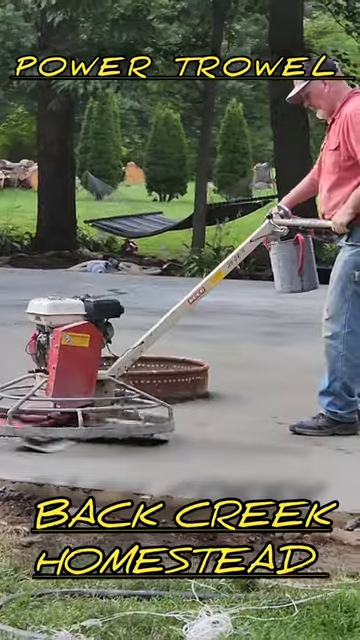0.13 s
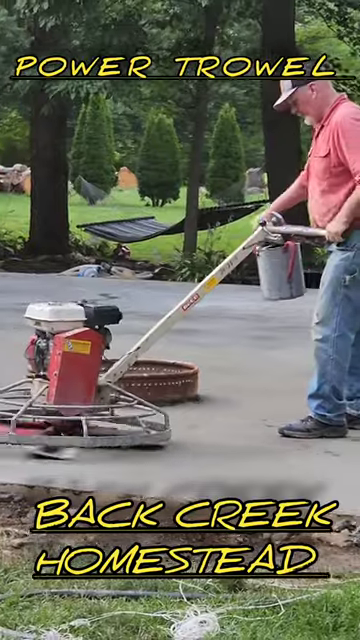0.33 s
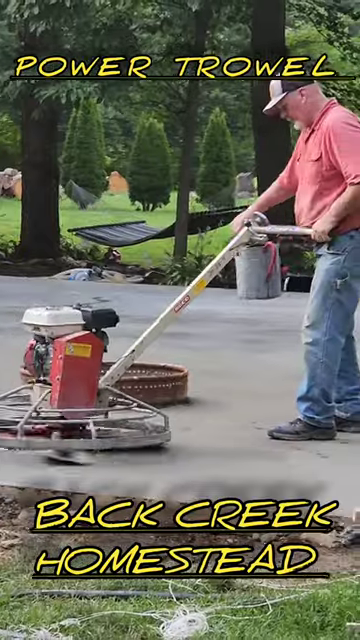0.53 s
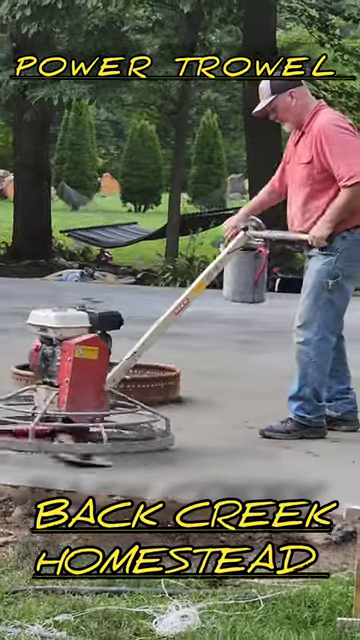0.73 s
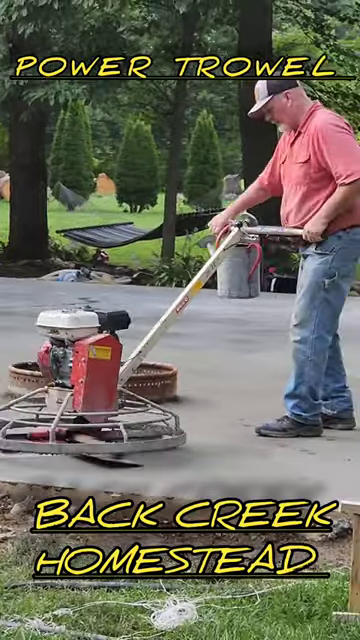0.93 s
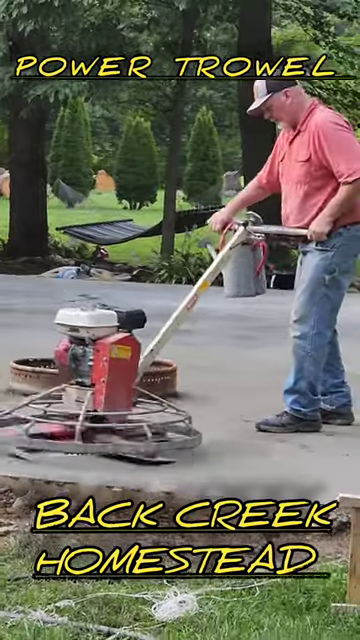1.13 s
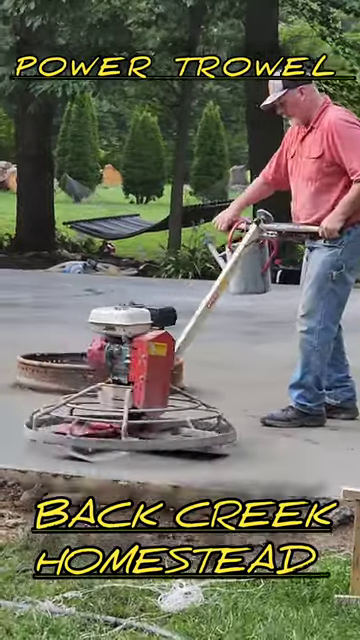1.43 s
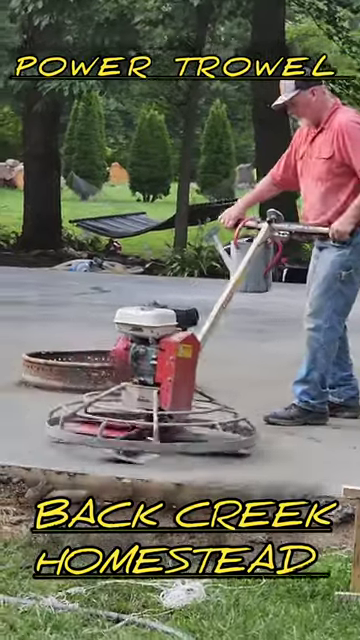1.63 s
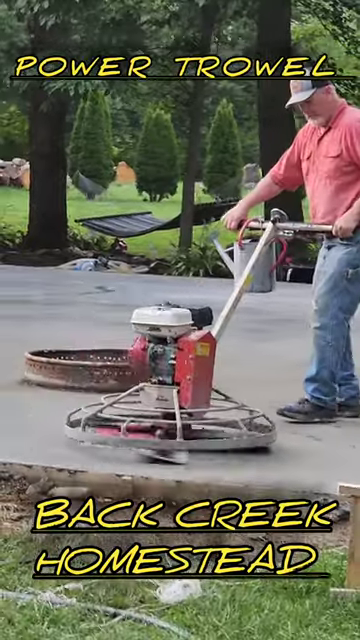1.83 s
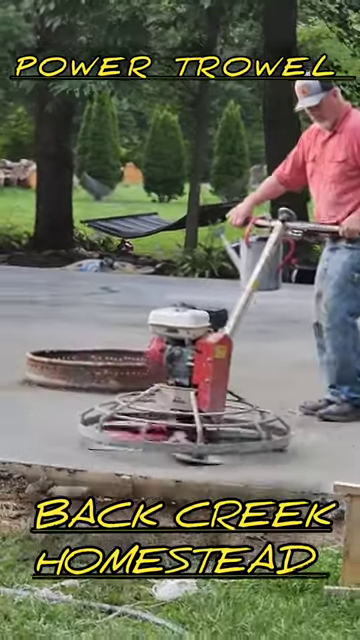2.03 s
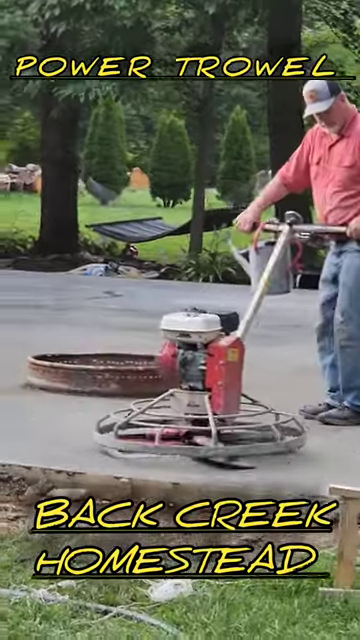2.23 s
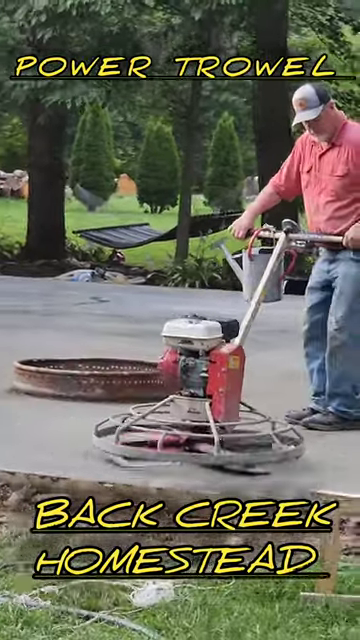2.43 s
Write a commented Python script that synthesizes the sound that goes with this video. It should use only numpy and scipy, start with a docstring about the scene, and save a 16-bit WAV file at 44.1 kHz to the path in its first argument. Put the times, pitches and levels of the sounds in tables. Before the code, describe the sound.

Concrete-smoothing machine close by: steady low engine buzz, harsh surging blade scrape, light metal rattles and clanks

```python
"""A walk-behind power trowel smooths fresh concrete outdoors, a few metres from a phone with two microphone ports.
Its single-cylinder four-stroke fires about 31 times a second: a sum of sine orders, delayed by the muffler,
whose colour shifts as the machine swings round. Steel blades scrape the slab in gritty surges of shaped noise,
with sharp ticks of grit. The guard cage rattles and clanks in dying modes, over a low rumble and a faint hum."""
import sys
import numpy as np
from scipy import signal
from scipy.fft import rfft, irfft
from scipy.io import wavfile
from scipy.ndimage import uniform_filter1d

SR = 44100
rng = np.random.default_rng(int(sys.argv[2]) if len(sys.argv) > 2 else 0)


def to_wav(s):
    """Save 16-bit WAV."""
    ch = np.atleast_2d(s).T  # columns
    pcm = np.round(np.clip(ch, -1, 1) * 32767)  # PCM
    wavfile.write(sys.argv[1], SR, pcm.astype(np.int16))


def nominal_scale(level):
    """Amplitude ratio for a level in decibels (scalar or array-like)."""
    x = np.asarray(level, float) / 20
    return 10 ** x


N = 114219
T = np.arange(N) / SR

# running speed of the engine: time_s, firing_rate_hz
SPEED = [(0.0, 31.2), (0.25, 31.4), (0.5, 31.71), (0.8, 31.58), (1.1, 31.56), (1.4, 31.36), (1.7, 31.19),
         (2.0, 31.07), (2.3, 31.05), (2.6, 30.99)]


def evened(x):
    """Scales a signal to an rms of 1."""
    return x / np.sqrt(np.mean(x ** 2) + 1e-20)


def read(points, hz):
    """Reads a curve of (hz, value) points along a logarithmic frequency axis."""
    f, value = np.transpose(points)
    return np.interp(np.log(hz + 1), np.log(f + 1), value)


def slow(top_hz, count):
    """Smooth random curves of rms 1, each a sum of slow sines that weaken with frequency."""
    f = np.geomspace(.4, top_hz, num=16)[:, None]
    t = T[::64]
    curves = []
    for _ in range(count):
        waves = np.sin(2 * np.pi * (f * t + rng.random(f.shape))) / np.sqrt(f)
        curves.append(np.interp(T, t, evened(waves.sum(0))))
    return np.array(curves)


def hiss(field_db):
    """Two unrelated noises that share a dB field over frequency and time."""
    z = rng.standard_normal((field_db.shape[1], 257, 4)).T
    spectra = (z[:2] + 1j * z[2:]) * nominal_scale(field_db)
    return signal.istft(spectra, nperseg=512, noverlap=384)[1][:, :N]


def ring(hz, t60):
    """One dying mode with a soft start of 1.6 ms."""
    t = T[:SR // 8]
    return nominal_scale(-60 * t / t60) * np.minimum(t / 0.0016, 1) * np.sin(2 * np.pi * hz * t)


def cycles():
    """Firings counted since the start: the running sum of the firing rate."""
    first_firing = .938  # cycles
    return first_firing + np.cumsum(np.interp(T, *np.transpose(SPEED))) / SR


def exhaust(turns):
    """Each order is a sine, delayed near the muffler's chambers; firings differ a little in strength and timing."""
    # exhaust orders: multiple_of_firing_rate, first_heading_db, middle_heading_db, last_heading_db
    orders = [(1, -32, -34, -37), (2, -22, -26.5, -25), (3, -27.5, -32.5, -30.5), (4, -28, -29.5, -44),
              (5, -18, -17, -14), (6, -15.5, -20, -22), (7, -28.5, -26, -29.5), (8, -20, -23.5, -21),
              (9, -22, -26.5, -21), (10, -28.5, -25.5, -32), (11, -24.5, -28.5, -28), (12, -50, -25, -37.5),
              (14, -32, -44, -54), (15, -41, -42.5, -31)]
    # muffler chambers: resonance_hz, half_width_hz, passes
    chambers = [(160.4, 14., 2), (260., 5.6, 1)]
    # swing of the machine, held within 0-2 from first to last heading: time_s, heading_step
    swing = [(.3, 0.078), (.8, 0.53), (1.2, 0.85), (1.5, 0.97), (1.8, 1.69), (2.5, 2.1)]
    pulse_turn, low_order_shift = 1.49, .8  # radians
    drift_cycles = .016  # firing cycles gained per heading step
    drift_above_hz = 200  # orders above this drift in phase with the heading
    wander_db, uneven_db, jitter_cycles = 1., 1., .002  # rms
    order, *heading_db = np.transpose(orders)
    hz = order * np.mean(SPEED, axis=0)[1]
    lag = pulse_turn - sum(passes * np.arctan((hz - f) / half) for f, half, passes in chambers)
    # order 2 is shifted ahead and order 1 behind by this phase
    lag = lag + low_order_shift * np.select([order == 2, order == 1], [1, -1])
    heading = np.clip(np.interp(T, *np.transpose(swing)), 0, 2)

    firing = rng.standard_normal((int(turns[-1]) + 3, 2))
    strength, shift = (np.interp(turns, np.arange(len(firing)), firing[:, k]) for k in range(2))
    arrival = turns + jitter_cycles * shift
    wander = slow(9.0, count=len(order))
    out = np.zeros(N)
    for k, n in enumerate(order):
        level_db = np.interp(heading, range(3), np.array(heading_db)[:, k]) + wander_db * wander[k]
        drift = drift_cycles * (heading - .5) * (hz[k] > drift_above_hz)
        out += nominal_scale(level_db) * np.cos(2 * np.pi * n * (arrival + drift) + lag[k])
    return np.sqrt(2) * out * nominal_scale(uneven_db * strength)


def scrape(frame_s, bin_hz):
    """Steel on concrete: hiss coloured by frequency, with random patches, surges and a ringing rasp."""
    # surges of the scrape: time_s, level_db, treble_db (the treble counts relative to its mean)
    surges = [(0.09, -16, -14.5), (0.2, -18, -14), (0.28, -19.5, -3.5), (0.36, -20, -11), (0.41, -18, -10),
              (0.48, -18, -14), (0.56, -18.5, -15.5), (0.71, -19, -9.5), (0.77, -17.5, -13.5),
              (0.84, -18, -12.5), (0.95, -16.5, -12.5), (1.02, -18.5, -13.5), (1.12, -16, -10),
              (1.24, -19, -12.5), (1.45, -16, -12.5), (1.56, -16.5, -10.5), (1.66, -17.5, -13),
              (1.76, -18.5, -12), (1.83, -15.5, -10.5), (1.89, -16, -13.5), (2.04, -17, -9.5),
              (2.17, -18.5, -12), (2.35, -16.5, -11.5), (2.55, -17, -11)]
    # colour of the scrape: frequency_hz, density_db (per Hz, relative)
    colour = [(250, -7), (420, -2.5), (613, 0), (725, 0), (1030, -8.5), (1230, -1), (1410, -5),
              (1670, -0.5), (1940, -8.5), (2190, -1.5), (2790, -9.5), (3060, -8.5), (3900, -4.5),
              (4330, 2.5), (5040, -12.5), (6620, -21.5), (7000, -21.5), (7330, -13.5), (7750, -20),
              (8440, -22.5), (10000, -19), (10900, -21), (12700, -16.5), (13700, -21.5), (15600, -15.5)]
    # lift of the ringing rasp of the blades: time_s, lift_db
    rasp = [(.11, -6.5), (.28, 3.5), (.45, -3.5), (.6, -1.5), (.7, 0), (1.1, -2.5), (1.3, -1), (1.58, 0),
            (1.65, -5.5), (1.9, -2), (2.15, -1.5), (2.36, 2), (2.55, -0.5)]
    rasp_hz, rasp_width_hz = 4310, 400
    patch_db, flicker_db = 1.34, 0.77  # rms
    s, level_db, treble_db = np.transpose(surges)
    patches = rng.standard_normal((len(frame_s), 257)).T
    patches = uniform_filter1d(patches, size=4, axis=0)
    patches = evened(uniform_filter1d(patches, size=20, axis=1))
    flicker = evened(uniform_filter1d(rng.standard_normal(len(frame_s)), size=4))
    field = read(colour, bin_hz)[:, None] + patch_db * patches + flicker_db * flicker

    treble = np.clip((bin_hz - 5200) / 900, 0, 1)[:, None]
    shaped = np.interp(frame_s, s, level_db)
    shaped = shaped + treble * np.interp(frame_s, s, treble_db - treble_db.mean())
    rasp_band = np.exp(-((bin_hz[:, None] - rasp_hz) / rasp_width_hz) ** 2)
    shaped = shaped + rasp_band * np.interp(frame_s, *np.transpose(rasp))

    # levels count against the unsurged power of the middle band
    mids = (bin_hz > 1000) & (bin_hz < 5500)
    power = (nominal_scale(field + shaped) ** 2).mean(1).sum()
    mid_power = (nominal_scale(field[mids]) ** 2).mean(1).sum()
    return evened(hiss(field + shaped)) * np.sqrt(power / mid_power)


def grit():
    """Random grains under the blades, each a burst of power that dies away, as a roughness of rms 1."""
    grains_per_s, spread_db, t60, share = 760, 2, 0.0094, 0.35  # t60 in seconds, share 0-1
    grains = nominal_scale(spread_db * np.minimum(rng.exponential(1, N), 6)) * (rng.random(N) < grains_per_s / SR)
    power = signal.lfilter([1], [1, -nominal_scale(-120 / (t60 * SR))], grains ** 2)
    return evened(1 - share + share * evened(np.sqrt(power)))


def blades(turns):
    """The scrape, roughened by grit and puffing slightly with each firing."""
    frame_s = np.arange(N // 128 + 5) * 128 / SR
    noise = scrape(frame_s, np.fft.rfftfreq(512, 1 / SR))
    puff_db, puff_phase = 1.1, -.03  # peak gain, cycles
    puff = nominal_scale(puff_db * np.cos(np.pi * (turns + puff_phase)) ** 4)
    return noise * grit() * puff


def ticks():
    """Sharp ticks of grit under a blade: dying bursts of noise through a high-pass."""
    # ticks: start_s, level_db (before the high-pass)
    bursts = [(0.166, -16.5), (.6894, -17), (.8032, -31), (1.2654, -15), (1.378, -16), (2.0483, -16),
              (2.452, -18)]
    t60, low_hz = 0.028, 5000  # s, Hz
    out, t = np.zeros((2, N)), T[:SR // 30]
    for (s, db), burst in zip(bursts, rng.standard_normal((len(bursts), 2, len(t)))):
        out[:, round(s * SR):][:, :len(t)] += nominal_scale(db - 60 * t / t60) * burst
    return signal.sosfilt(signal.butter(2, low_hz, "high", fs=SR, output="sos"), out)


def cage(turns):
    """Rattles, thickest at each firing, ring one mode each; a clank chatters a close pair and weakly all modes."""
    # modes of the guard cage: ring_hz, relative_db, t60_s
    modes = [(750, -20.5, 0.19), (1560, -9.5, 0.051), (2190, -10, 0.062), (3070, -6, 0.057),
             (4224, -3, 0.022)]
    # clanks of the cage: start_s, level_db, ring_hz
    clanks = [(0.092, -8, 2140), (.158, -7, 2190), (.257, -4, 4440), (0.695, -1.5, 4420),
              (1.197, -11, 2190), (1.256, -6, 4250), (1.376, -4, 4260), (1.42, 1, 3100), (1.812, -4, 2510)]
    rattles_per_s, rattle_db = 150, -30.5  # mean rate, rms level
    chatter_s = .012  # a clank is a short run of contacts
    chance = 2 * np.cos(np.pi * turns) ** 2 * rattles_per_s / SR
    size = nominal_scale(1.8 * np.minimum(rng.exponential(1, N), 3)) * (rng.random(N) < chance)
    which = rng.integers(0, len(modes), N)
    rattles = np.zeros(N)
    body = np.zeros(SR // 8)
    for k, (hz, db, t60) in enumerate(modes):
        mode = nominal_scale(db) * ring(hz, t60)
        rattles += signal.oaconvolve(size * (which == k), mode)[:N]
        body += mode
    out = nominal_scale(rattle_db) * evened(rattles)

    contacts = rng.standard_normal((len(clanks), round(chatter_s * SR)))
    for (s, db, hz), contact in zip(clanks, contacts):
        part = out[round(s * SR):][:SR // 8]
        tone = ring(hz, .016) + ring(hz * 1.06, .01) + nominal_scale(-11) * body
        chatter = np.convolve(tone, contact / np.linalg.norm(contact))
        part += nominal_scale(db) * chatter[:len(part)]
    return out


def rumble():
    """Low noise of the block and frame between the orders, unrelated in the two channels."""
    # colour of the rumble: frequency_hz, density_db (per Hz, relative)
    colour = [(15, -12), (50, -6), (80, -4), (120, -1), (200, 0), (380, -5), (700, -40)]
    level_db = -32  # rms
    z = rfft(rng.standard_normal((2, N))) * nominal_scale(read(colour, np.fft.rfftfreq(N, 1 / SR)))
    return nominal_scale(level_db) * evened(irfft(z, N))


def hum():
    """A faint steady hum apart from the orders: one sine whose pitch wavers slightly."""
    pitch_hz, level_db, waver_hz = 113., -28, .4  # level and waver are rms
    hz = pitch_hz + waver_hz * slow(4.0, count=1)[0]
    return np.sqrt(2) * nominal_scale(level_db) * np.sin(2 * np.pi * np.cumsum(hz) / SR)


def scene():
    """Channel one is the direct sound, channel two its scattered twin, 7 ms later."""
    turns = cycles()
    direct = exhaust(turns) + hum() + cage(turns)
    return np.array([direct, np.roll(direct, 310)]) + rumble() + blades(turns) + ticks()


def roll_off(x):
    """The treble ends steeply here."""
    return signal.sosfilt(signal.butter(12, 17060, fs=SR, output="sos"), x)


def record(dry):
    """Two ports hear direct and scattered sound unequally; soft overload, band limit and a late stepped start."""
    # microphone ports: frequency_hz, likeness (0-1), left_minus_right_db, left_lead_radians
    ports = [(60, .985, .8, -.2), (250, .99, .2, -.22), (430, .9, -2.5, 0), (600, .8, 2.5, .4),
             (930, .85, 6, -.3), (1250, .85, -1.5, -.6), (1600, .9, 0, 0), (1820, .7, 4, -.5),
             (2200, .85, -4, -.7), (2650, .6, -4, 0), (2900, .72, 1, -.7), (3700, .78, -4, -.4),
             (4350, .85, -13, .3), (5800, .5, 3, .7), (6500, .2, 17, .8), (7400, .55, 18, -1.4),
             (8600, .45, 6, -2.2), (10300, .45, 10, -1.6), (12000, .55, 3, -2.8), (15500, .45, 10, -3.1)]
    ceiling, edge_hz = 1.83, 15810  # overload level, top of the band
    start_s, full_s, first_db = .0585, .0645, -12  # silent, then quiet, then full level
    hz = np.fft.rfftfreq(N, 1 / SR)
    direct, scattered = rfft(dry)
    same, lean_db, lead = (read(np.array(ports)[:, [0, k]], hz) for k in (1, 2, 3))
    lean = nominal_scale(lean_db / 2)
    left = direct * lean * np.exp(.5j * lead)
    right = (same * direct + np.sqrt(1 - same ** 2) * scattered) / lean * np.exp(-.5j * lead)
    # keeps the middle of the two ports at the level of the dry sound
    middle = np.sqrt(lean ** 2 + lean ** -2 + 2 * same * np.cos(lead)) / 2
    x = irfft(np.array([left, right]) / middle, N)
    x = ceiling * np.tanh(x / ceiling)
    x = irfft(rfft(x) * np.clip((edge_hz - hz) / 150, 0, 1), N)
    step_s = [start_s, start_s + 0.00034, full_s, full_s + 0.00016]
    x = x * np.interp(T, step_s, [0, nominal_scale(first_db), nominal_scale(first_db), 1])
    return roll_off(np.clip(x, -1, 1))


dry = scene()
out = record(dry)
to_wav(out)
```